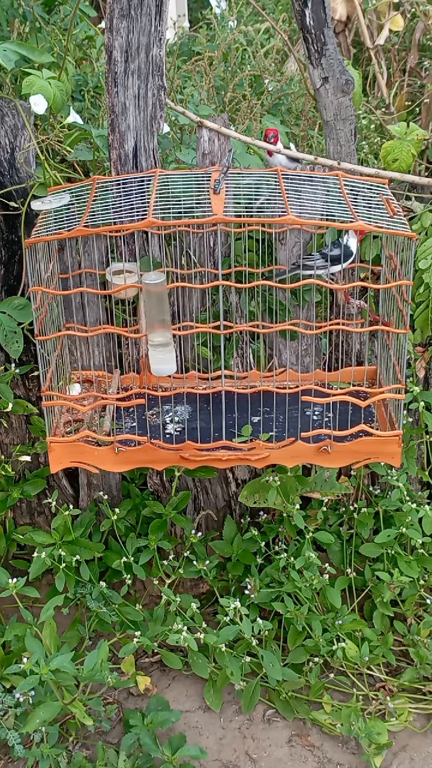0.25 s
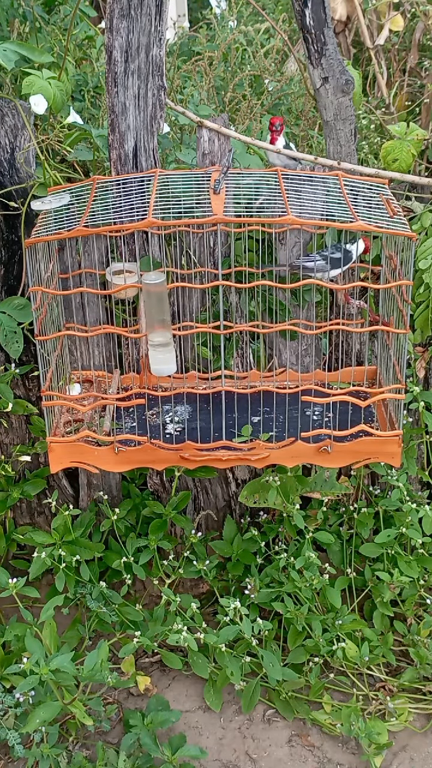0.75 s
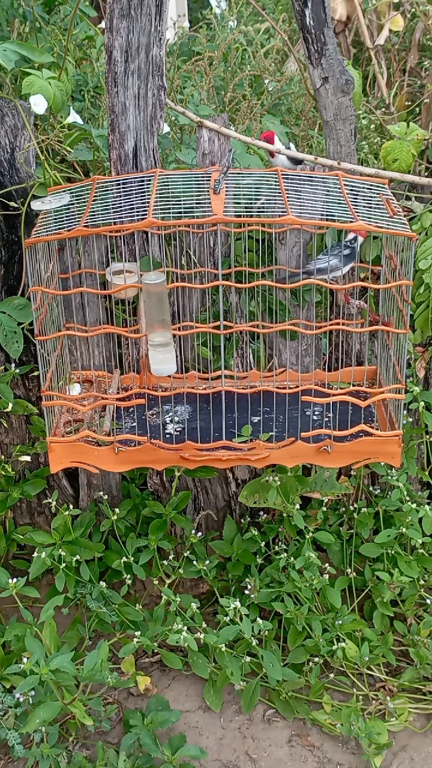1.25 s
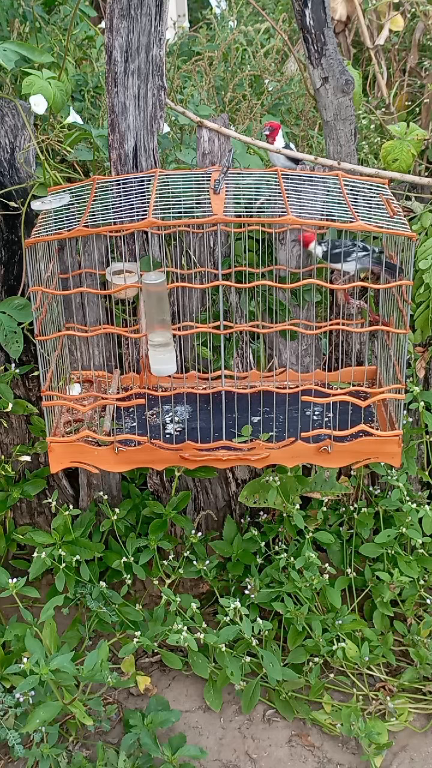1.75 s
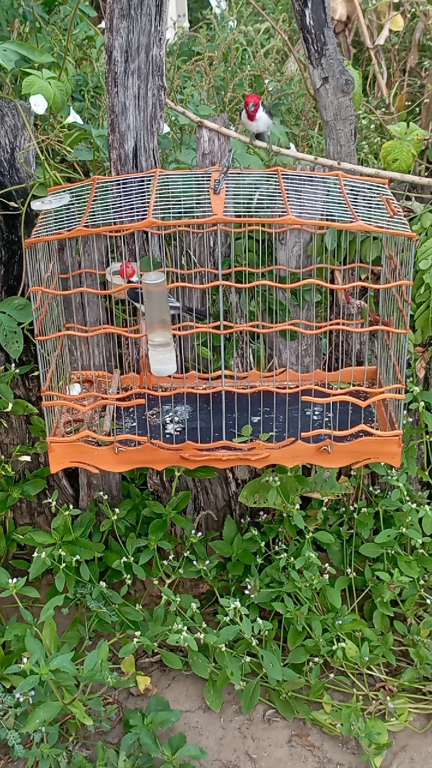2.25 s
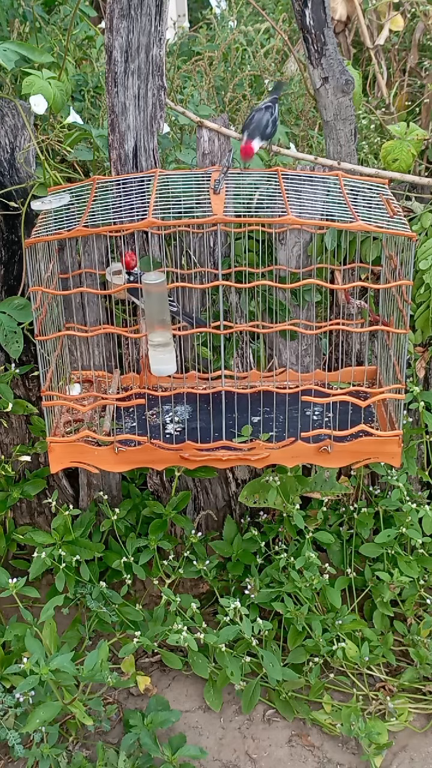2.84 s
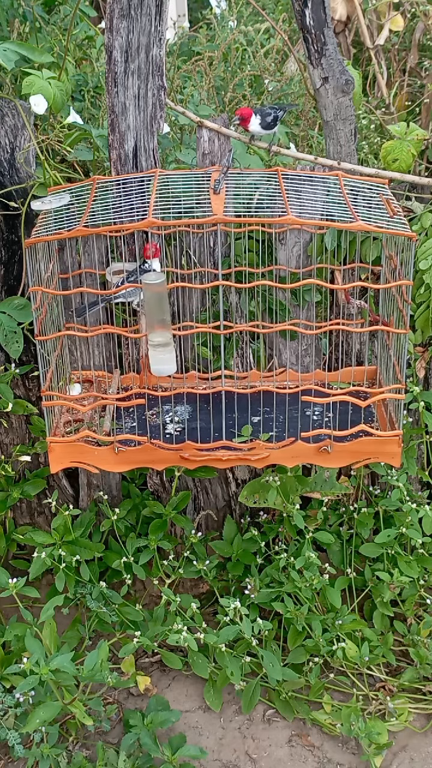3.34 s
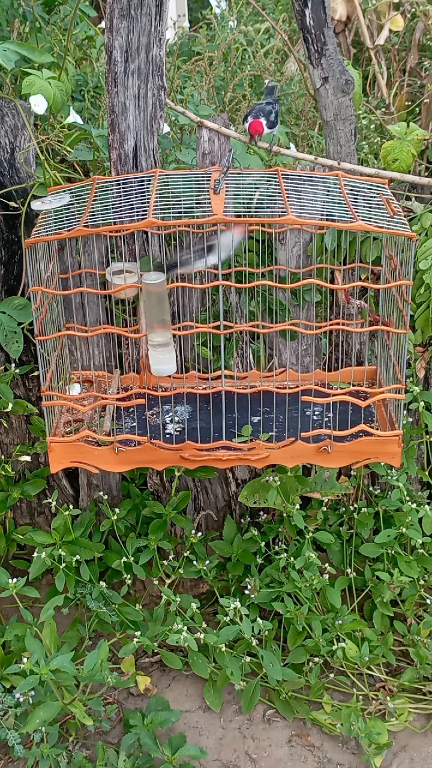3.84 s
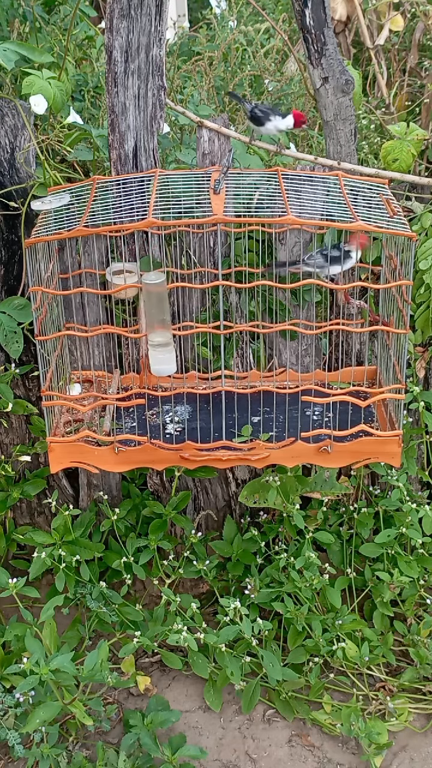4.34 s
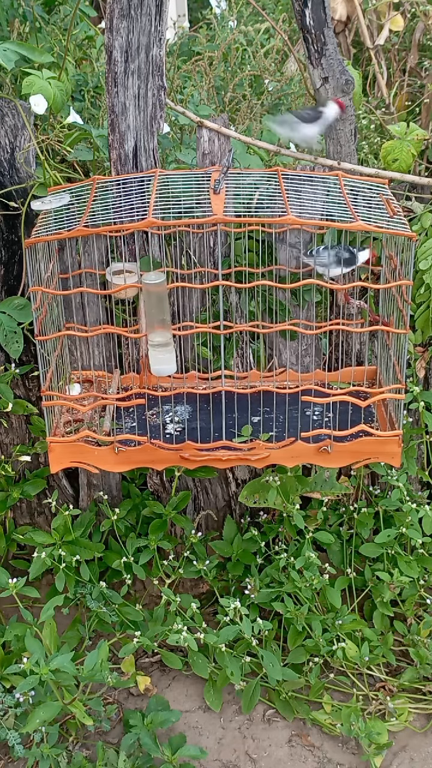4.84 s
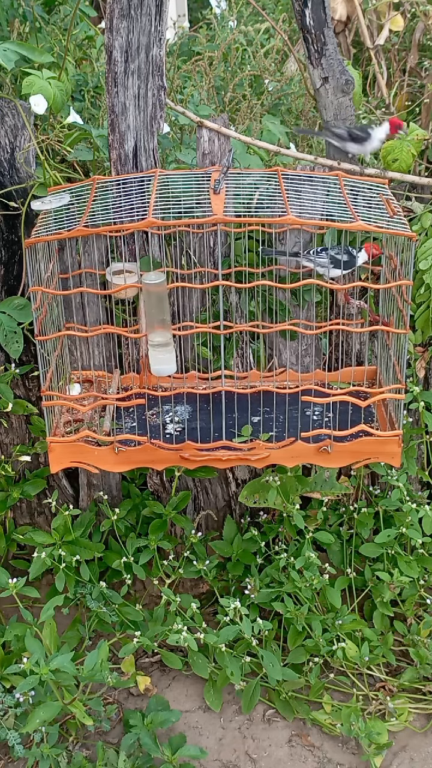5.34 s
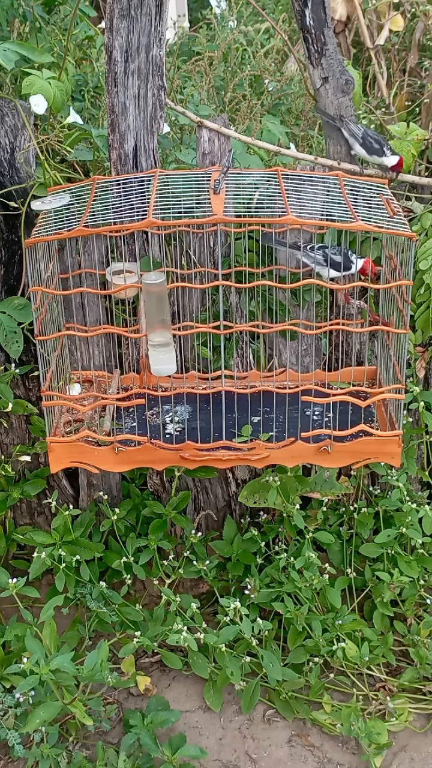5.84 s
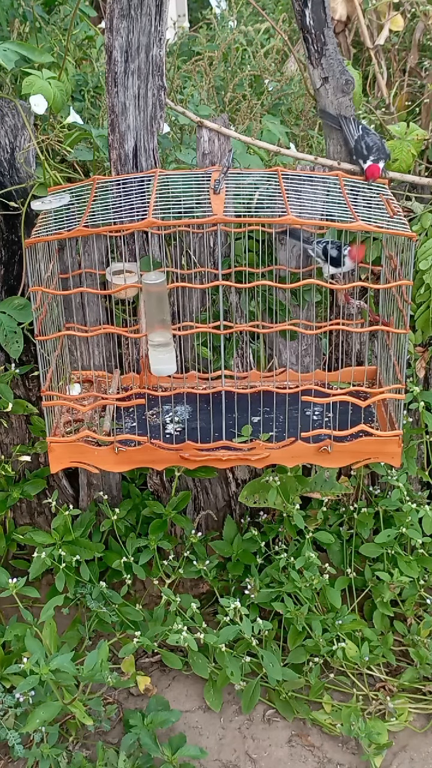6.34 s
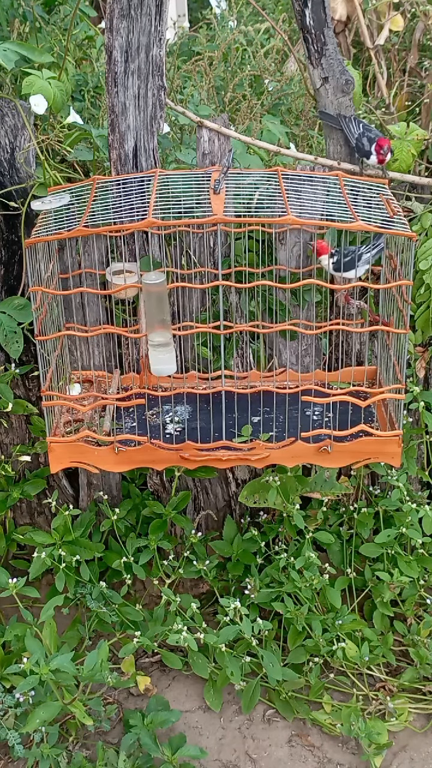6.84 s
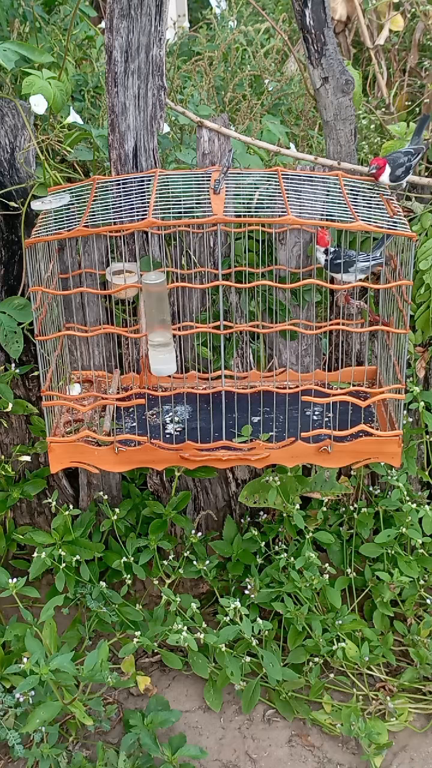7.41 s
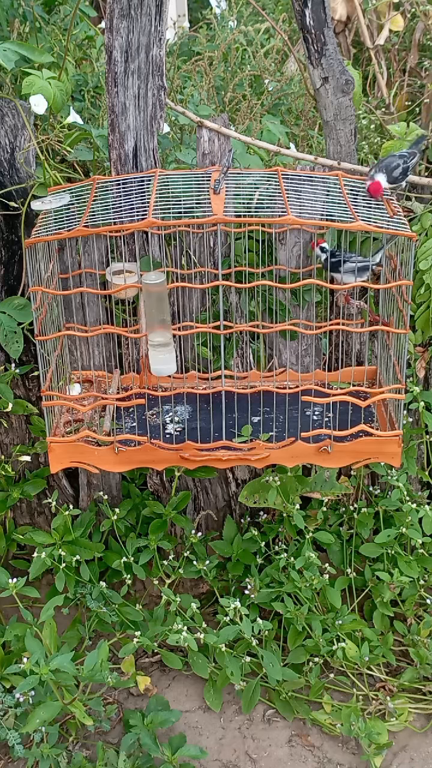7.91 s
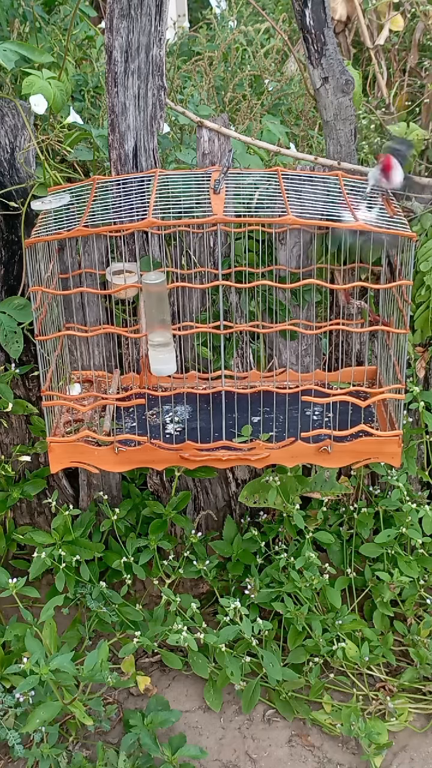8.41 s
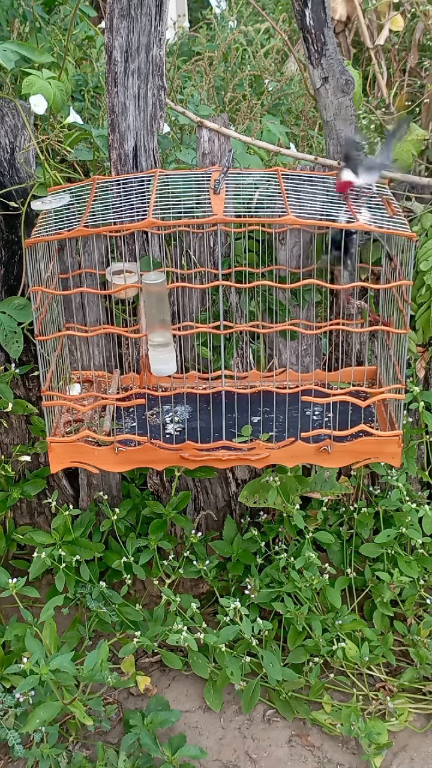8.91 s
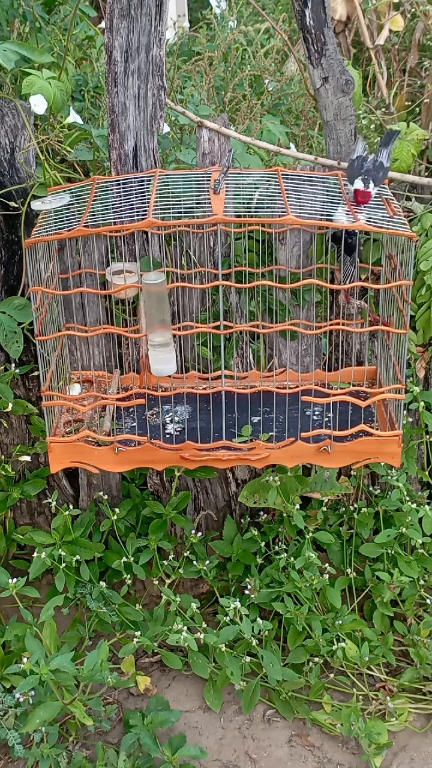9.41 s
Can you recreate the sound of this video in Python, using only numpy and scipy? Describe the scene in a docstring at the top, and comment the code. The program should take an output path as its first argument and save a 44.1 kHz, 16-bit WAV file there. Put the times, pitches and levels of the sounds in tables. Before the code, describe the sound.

Two cardinals trade sharp, sliding, sometimes raspy calls outdoors over pulsing crickets, with soft foot scuffs and wings fluttering against cage wire.

```python
"""Among bushes, a cardinal in a wire cage and one on a branch above it trade sharp, sliding calls.
Pure whistles break into rasps when the birds force their voices; late on, wings flutter against the bars.
Crickets rub their wings: a chorus swells and sinks, and a near one chirps steadily. Small birds twitter
far off, over a low rush of air and a thin hiss. Close by, on the side away from the cage, come scuffs
and soft thuds, probably feet shifting on sandy ground."""
import sys
import numpy as np
from scipy import signal
from scipy.fft import rfft, irfft
from scipy.io import wavfile
from scipy.ndimage import uniform_filter1d

SR = 44100
rng = np.random.default_rng(int(sys.argv[2]) if len(sys.argv) > 2 else 0)


def wav_out(sig):
    """Save sig, one row per channel (or a flat mono array), as 16-bit PCM at SR to the path in sys.argv[1]."""
    wavfile.write(sys.argv[1], SR, np.round(np.clip(np.atleast_2d(sig).T, -1, 1) * 32767).astype(np.int16))


N = 426447
T = np.arange(N) / SR
FREQS = np.arange(N // 2 + 1) * SR / N


def from_db(db):
    """Turn decibels into a number to multiply by."""
    return 10 ** (np.asarray(db) / 20)


def rms_one(x):
    """Scale a sound so that its average strength (rms) is 1."""
    return x / np.sqrt(np.mean(x ** 2) + 1e-20)


def at_hz(points):
    """Read a (frequency, value) table at every frequency."""
    hz, value = np.transpose(points)
    return np.interp(np.log(FREQS + 1), np.log(hz), value)


def filtered(x, gain):
    """Turn each frequency up or down by its own gain."""
    return irfft(rfft(x) * gain, N)


def noise(spectrum, alike):
    """Stereo noise of a given colour; `alike` is 0 for unrelated sides, 1 for equal ones."""
    mid, side = rng.standard_normal((2, N))
    both = np.sqrt(1 + alike) * rfft(mid) + np.sqrt(1 - alike) * rfft(side) * [[1], [-1]]
    return rms_one(irfft(both * from_db(at_hz(spectrum)), N))


def drift(rate, t=T):
    """A random wander, roughly 1 in size, with `rate` turns a second."""
    turns = (t - t[0]) * rate
    count = int(turns[-1]) + 2
    return np.interp(turns, np.arange(count), rng.standard_normal(count))


def phase_of(hz):
    """The running angle of a wave whose pitch moves."""
    return 2 * np.pi * np.cumsum(hz) / SR


def bump(time, half_length):
    """A smooth rise and fall that peaks at `time`."""
    return np.exp(-np.minimum(((T - time) / half_length) ** 2, 40))


def delayed(x, seconds):
    """The same sound a little later."""
    return filtered(x, np.exp(-2j * np.pi * FREQS * seconds))


def from_left(x, lag_s):
    """Sound from the cage's side reaches the left microphone first."""
    return np.array([x, delayed(x, lag_s)])


def from_ground(x, lag_s=0.00017):
    """Sound from underfoot reaches the right microphone first."""
    return np.array([delayed(x[0], lag_s), x[-1]])


def foliage(x, tail_s):
    """Trunks and leaves scatter a sound into a short tail, different on each side."""
    t = T[:SR // 2]
    tail = rng.standard_normal((2, len(t))) * from_db(-60 * t / tail_s) * (1 - np.exp(-t / 0.018))
    return signal.fftconvolve(x[None], tail / np.sqrt(np.sum(tail[0] ** 2)), axes=1)[:, :N]


def slur(row, offset_s=0, edge_db=-12.5, fade_s=0.0013):
    """A slur is a note that slides from start over top to end: gives its samples, pitch, gain and rasp."""
    top_s, rise, fall, start_hz, top_hz, end_hz, db, growth_db, rasp = row
    top_s += offset_s
    at = np.arange(int((top_s - rise) * SR), int((top_s + fall) * SR))
    t, position = T[at] - top_s, np.linspace(-1, 1, len(at))
    away = np.sin(np.pi / 2 * t / np.where(t < 0, rise, fall)) ** 2
    hz = top_hz + away * (np.where(t < 0, start_hz, end_hz) - top_hz)
    fade = np.clip(np.minimum(t + rise, fall - t) / fade_s, 0, 1)
    return at, hz, fade * from_db(db + growth_db * position / 2 + edge_db * position ** 2), rasp


def wavering(t, hz, rasp, jitter=0.025, shimmer=0.6):
    """Phase and strength of a bird's voice; both turn unsteady when it is forced."""
    return phase_of(hz * (1 + jitter * rasp * drift(1872, t))), 1 + shimmer * rasp * drift(1200, t)


def outdoor_air(rush_db=-56.5, hiss_db=-70):
    """A low rush and a thin hiss, each wandering a little in level."""
    # colours of the rush and the hiss: (frequency [Hz], level [dB])
    rush_colour = [(18, -72), (30, -25), (46, -13), (56, -9), (65, 6), (77, -2), (129, -0.5), (163, -3.5),
                   (242, -3.5), (311, -8.5), (513, -10), (979, -21.5), (2000, -21.5), (4400, -23.5),
                   (5400, -3.5), (9680, -120)]
    hiss_colour = [(2500, -69), (4500, -41), (6000, 1.5), (7500, -6.5), (10000, -6), (12500, -10.5),
                   (15000, -21.5)]
    # how alike the rush is on both sides: (frequency [Hz], likeness [0-1])
    likeness = [(60, 0.4), (400, 0.39), (1200, 0.18), (2500, 0), (15000, 0)]
    rush = from_db(rush_db + drift(8.8)) * noise(rush_colour, at_hz(likeness))
    return rush + from_db(hiss_db + 2.4 * drift(11)) * noise(hiss_colour, 0)


def twitter(count=170, low_hz=1670, high_hz=4590, level_db=-71.5, rise_s=0.012, fall_s=0.0197):
    """Distant birds give tiny slurs at random moments and pitches."""
    out = np.zeros(N)
    for when, pitch, size in rng.random((count, 3)):
        top_s = 0.5 + when * (T[-1] - 1)
        top_hz = low_hz * (high_hz / low_hz) ** pitch
        edge_hz, db = 0.779 * top_hz, level_db + 3 * (2 * size - 1)
        at, hz, gain, _ = slur((top_s, rise_s, fall_s, edge_hz, top_hz, edge_hz, db, 0, 0))
        phase = phase_of(hz)
        out[at] += gain * (np.sin(phase) + from_db(-8) * np.sin(2 * phase))
    return out + foliage(out, tail_s=0.17)


def far_chirps(trim_db=-12, bow=0.01338, waver=0.029, flicker_db=5):
    """Far birds give thin, flickering chirps, blurred by the leaves."""
    # chirps: (time [s], length [s], start pitch [Hz], end pitch [Hz], level before trim [dB])
    chirps = [(2.415, 0.072, 3100, 4500, -52), (2.611, 0.072, 3170, 4470, -53.5),
              (2.718, .04, 4400, 4100, -50), (2.863, 0.059, 2710, 3060, -49),
              (3.513, 0.13, 3470, 3270, -48.5), (3.617, 0.21, 4730, 2760, -50.5),
              (6.189, 0.075, 2890, 3250, -48), (6.216, 0.05, 3750, 3860, -45),
              (6.446, 0.07, 3040, 4270, -47), (8.06, 0.053, 3280, 2280, -60), (8.676, .07, 4120, 3730, -52),
              (9.07, 0.066, 3500, 4200, -55), (9.292, 0.066, 3500, 3990, -57)]
    out = np.zeros(N)
    for time, length, start_hz, end_hz, db in chirps:
        progress = np.linspace(0, 1, int(length * SR))
        t, arch = progress * length, np.sin(np.pi * progress)
        hz = (start_hz + (end_hz - start_hz) * progress) * (1 + bow * arch + waver * drift(305, t))
        gain = from_db(db + trim_db + flicker_db * drift(78, t)) * arch
        out[int(time * SR) + np.arange(len(t))] += gain * np.sin(phase_of(hz))
    return out + from_db(-3) * foliage(out, tail_s=0.54)


def far_song(first_s=0.093, every_s=0.2045, repeats=7):
    """A far bird repeats one phrase; forcing its voice adds tones at 0.5 and 1.5 times the pitch."""
    # slurs: (time of the top in the phrase [s], rise [s], fall [s], start pitch [Hz], top pitch [Hz],
    # end pitch [Hz], level [dB], growth in level [dB], rasp [0-1])
    phrase = [(.016, .016, 0.017, 1597, 2210, 1400, -69, 29, 0.23),
              (.043, .011, 0.025, 2240, 2860, 2140, -70, -17, 0.72),
              (.062, .006, 0.021, 2270, 2170, 2100, -64.5, -15, .2)]
    out = np.zeros(N)
    for k in range(repeats):
        for row in phrase:
            at, hz, gain, rasp = slur(row, first_s + k * every_s)
            phase, strength = wavering(T[at], hz, rasp, jitter=0.018)
            growl = from_db(3) * np.sin(phase / 2) + from_db(-19) * np.sin(1.5 * phase)
            out[at] += gain * strength * (np.sin(phase) + rasp * growl)
    return out + from_db(-7) * foliage(out, tail_s=0.072)


def cricket_group(centre_hz, scratch, spread_hz=0, count=1, bend=0, octave_db=-11):
    """Each wing stroke is a scratchy tone with its octave; the pitch sags as the wing slows."""
    out = np.zeros((2, N))
    for hz in centre_hz + spread_hz * np.linspace(-1, 1, count):
        strokes_per_s = 53.6 * rng.uniform(1.0, 1.02)
        stroke = (T * strokes_per_s + rng.random() + 0.18 * drift(4)) % 1
        pitch = hz * (1 + bend) * (1 + 0.025 * (0.5 - stroke) + scratch * drift(700))
        phase = phase_of(pitch) + rng.uniform(0, 2 * np.pi, (2, 1))
        out += np.sin(np.pi * stroke) * (np.sin(phase) + from_db(octave_db) * np.sin(2 * phase))
    return rms_one(out)


def cricket_chorus(crowd_rise_db=7.5, rest_db=-22, edge_s=0.0512, pitch_lift=0.018):
    """A crowd of crickets swells and sinks; two nearer ones join each swell, pitch lifting with effort."""
    # swells: (middle time [s], half length [s], extra level [dB])
    swells = [(0.388, .21, 1), (1.211, .19, 0), (2.041, 0.22, -1.5), (2.847, 0.2, 0.5), (3.66, 0.18, 1.5),
              (4.46, .2, 1), (5.25, .18, 0), (6.078, .19, 0), (6.888, .2, -2.5), (7.717, .18, -1),
              (8.519, .19, -0.5), (9.397, .19, -2.5)]
    swell_db, effort, singing = np.zeros((3, N))
    for time, half_length, db in swells:
        swell_db += (crowd_rise_db + db) * bump(time, half_length)
        bout = 0.5 + 0.5 * np.tanh((half_length - np.abs(T - time)) / edge_s)
        effort += bout
        singing += bout * from_db(db)
    bend = pitch_lift * (effort - 1)
    crowd = cricket_group(centre_hz=5250, scratch=0.024, spread_hz=170, count=6, octave_db=-20)
    lead = cricket_group(centre_hz=5490, scratch=0.013, bend=bend + 0.005 * drift(7))
    second = cricket_group(centre_hz=5340, scratch=0.012, bend=bend + 0.005 * drift(7))
    crowd *= from_db(-62 + swell_db + 1.5 * drift(10))
    pair = lead * from_db(-55 + 1.6 * drift(25)) + second * from_db(-57 + 1.6 * drift(12))
    return crowd + (singing + from_db(rest_db)) * pair


def near_cricket(pitch_hz=6600, level_db=-51, every_s=0.655, strokes_per_s=40, stroke_count=13):
    """Each chirp is a run of wing strokes, each a short tone that falls slightly in pitch."""
    # spells of chirping: (first chirp [s], end [s])
    bouts = [(-.172, 5.45), (5.811, 7.5), (7.792, 9.5)]
    gain, slide = np.zeros((2, N))
    for time in np.concatenate([np.arange(first, end, every_s) for first, end in bouts]):
        strokes = (T - time) * strokes_per_s
        on = (strokes > 0) & (strokes < stroke_count)
        progress = np.minimum(strokes[on] % 1 / 0.74, 1)   # the wing sounds for 74% of a stroke
        gain[on] = np.abs(np.sin(np.pi * progress)) ** 0.88
        slide[on] = 0.5 - progress
    hz = pitch_hz * (1 + 0.016 * slide + 0.0044 * drift(500))
    song = from_db(level_db) * gain * np.sin(phase_of(hz))
    return from_left(song, lag_s=0.00019) + from_db(-13) * foliage(song, tail_s=1.0)


def thuds():
    """Soft footfalls shake low ringing tones; some thuds are dull, others reach the higher tones too."""
    # footfalls: (time [s], level [dB], rise [s], fall [s], dull above [Hz])
    footfalls = [(1.52, -49, 0.014, 0.018, 700), (2.36, -55.5, 0.074, 0.3, 700),
                 (3.78, -48, 0.079, 0.45, 237), (4.103, -42.5, 0.061, 0.047, 650),
                 (4.418, -37, 0.073, 0.025, 153), (4.591, -46, 0.015, 0.036, 430),
                 (4.754, -44, 0.024, 0.031, 398), (5.0, -43, 0.018, 0.042, 590),
                 (5.893, -40, 0.03, 0.034, 292), (7.394, -40.5, 0.0034, 0.028, 1390),
                 (7.525, -45.5, 0.006, 0.023, 412), (8.202, -51.5, 0.0079, 0.035, 900),
                 (8.46, -50.5, 0.011, 0.12, 790), (9.6, -60, 0.096, 0.051, 875)]
    # ringing tones of a thud: (pitch [Hz], width [Hz], level [dB])
    tones = [(117, 74, -6), (234.5, 23, 5.5), (443, 56, -0.5), (652, 47, -5.5), (956, 250, -6)]
    body = sum((-1) ** k * from_db(db) / (1 + 1j * (FREQS - hz ** 2 / (FREQS + 1)) / width)
               for k, (hz, width, db) in enumerate(tones))
    shake = rms_one(filtered(rng.standard_normal(N), body))
    out = np.zeros(N)
    for time, db, rise, fall, corner_hz in footfalls:
        push = np.exp(-np.minimum(np.maximum((time - T) / rise, (T - time) / fall), 40))
        cut_highs = signal.butter(2, corner_hz, fs=SR, output="sos")
        out += from_db(db) * push * signal.sosfilt(cut_highs, shake)
    return from_ground([out])


def scuffs(trim_db=-1, hollow_db=7, loss_db_per_octave=9):
    """Sand grinds under a sole as grainy, hollow noise; some scuffs are full, others thinner."""
    # scuffs: (time [s], level before trim [dB], half length [s], thin below [Hz], hollowest at [Hz])
    scrapes = [(1.786, -44, 0.058, 150, 640), (1.85, -43.5, 0.066, 150, 840),
               (1.933, -45, 0.047, 300, 1300), (2.002, -48, 0.055, 200, 1350),
               (2.123, -46, 0.065, 300, 1680), (3.072, -44.5, 0.085, 180, 950),
               (3.165, -45.5, 0.058, 180.4, 1350), (4.027, -52.5, 0.16, 180, 790),
               (4.298, -44.5, .11, 580, 1320), (6.89, -54, 0.25, 520, 920)]
    # colour of grinding sand: (frequency [Hz], level [dB])
    sand_colour = [(150, -24), (255, -5), (430, -19), (700, -15.5), (1300, -18.5), (2000, -13.5),
                   (3100, -12.5), (5400, -18), (9000, -20), (14000, -33)]
    # hollow ringing tones: (pitch [Hz], width [Hz], relative level [dB])
    tones = [(597, 40, 16), (838, 50, 6), (1290, 80, 11), (1400, 70, 8), (1590, 90, 6), (2400, 160, 1)]
    sand, out = noise(sand_colour, alike=0.48), np.zeros((2, N))
    rings = []
    for hz, width, db in tones:
        ring = signal.lfilter(*signal.iirpeak(hz, hz / width, fs=SR), sand)
        rings.append((hz, from_db(db + 2 * drift(20)) * ring))
    grains = from_db(1.5 * drift(250) + 2 * drift(45))
    for time, db, half_length, edge_hz, hollow_hz in scrapes:
        hollow = sum(from_db(hollow_db - loss_db_per_octave * abs(np.log2(hz / hollow_hz))) * ring
                     for hz, ring in rings)
        cut_lows = signal.butter(2, edge_hz, "high", fs=SR, output="sos")
        grit = signal.sosfilt(cut_lows, rms_one(sand + hollow))
        out += from_db(db + trim_db) * bump(time, half_length) * grains * grit
    return from_ground(out)


def flutter(rustle_start_s=8.2, rustle_end_s=8.8, rustle_db=-63.5, rise_s=0.0012, fall_s=0.0075):
    """Each wingbeat is a dull flap and a crisp rake along the wires, over a lighter feather rustle."""
    # wings and feet brush the bars: (time [s], rake level [dB], flap level [dB], length [s])
    brushes = [(2.137, -52, -53, 0.012), (6.463, -57, -60.5, 0.0065), (7.401, -55, -55, 0.016),
               (8.132, -73, -53, 0.0043), (8.19, -47.5, -46, 0.031), (8.27, -53, -51, 0.0078),
               (8.294, -52, -49, 0.022), (8.33, -47, -61, 0.0045), (8.45, -45.5, -57, 0.0055),
               (8.478, -50, -55, 0.012), (8.517, -64, -52.5, 0.0067), (8.555, -46.5, -50.5, 0.016),
               (8.685, -70, -56, 0.006), (8.893, -67, -54.5, 0.0044), (9.14, -56, -79, .002),
               (9.205, -57, -57.5, 0.0079), (9.422, -58, -68, .003)]
    # colours of the rake and the flap: (frequency [Hz], level [dB])
    rake_colour = [(300, -25), (1500, 2), (3000, -1), (5000, 7.5), (8000, 5.5), (11000, 4), (15000, -7)]
    flap_colour = [(40, -25), (200, 9.5), (600, 2), (1500, -5), (3000, -6.5), (6000, -8)]
    flapping = np.exp(np.clip(np.minimum((T - rustle_start_s) / 0.029, (rustle_end_s - T) / 0.35), -40, 0))
    rustle = flapping * from_db(rustle_db + 6 * np.tanh(drift(60)))
    rake_gain, flap_gain = rustle.copy(), rustle.copy()
    for time, rake_db, flap_db, length in brushes:
        contact = np.exp(-np.clip(np.maximum((time - T) / rise_s, (T - time - length) / fall_s), 0, 40))
        rake_gain += contact * from_db(rake_db)
        flap_gain += contact * from_db(flap_db)
    rake = noise(rake_colour, alike=0.57) * rake_gain * from_db(3 * drift(1500))
    left, right = rake + noise(flap_colour, alike=0.57) * flap_gain
    return np.array([left, delayed(right, 0.00011)])


def whistles(trim_db=-1, overtone_step_db=-3, rasp_db=-12):
    """A cardinal slurs with one voice: gives the tone, overtones and strength of the breath noise."""
    # slurs: (time of the top [s], rise [s], fall [s], start pitch [Hz], top pitch [Hz], end pitch [Hz],
    # level before trim [dB], growth in level [dB], rasp [0-1], overtones against the tone [dB])
    slurs = [(1.652, 0.084, 0.0044, 2810, 4640, 4750, -29, 6, 0.6, -22),
             (1.727, 0.021, 0.031, 2970, 3470, 2830, -37, -11, 0.55, -26),
             (3.288, 0.024, 0.02, 1978, 2230, 1926, -35, 9, 0.13, -22),
             (3.343, 0.043, 0.066, 1943, 3024, 1276, -31.5, -9.5, 0.36, -13),
             (6.757, 0.046, 0.035, 2170, 2460, 2270, -37.5, 18, 0.6, -18),
             (6.822, 0.036, 0.035, 2350, 3525, 2250, -24, -6, 0.1, -21),
             (5.736, 0.0077, 0.013, 2860, 2790, 2400, -29, -1, 0, -26),
             (6.952, 0.0043, 0.023, 2880, 2836, 1900, -34, -29, 0.5, -26),
             (7.76, 0.01, 0.011, 3230, 3240, 3310, -25, -3, 0, -30),
             (7.776, 0.014, .02, 3280, 3870, 2380, -29.5, -6, 0.04, -23),
             (7.811, 0.025, 0.022, 2440, 2946, 2140, -24.5, -7, 0.11, -24.5),
             (7.897, 0.00348, 0.0244, 1970, 1840, 1330, -44, -27, 0.1, -30)]
    tone, overtones, breath = np.zeros((3, N))
    for *shape, overtones_db in slurs:
        at, hz, gain, rasp = slur(shape)
        phase, strength = wavering(T[at], hz, rasp)
        tone[at] += gain * strength * np.sin(phase)
        for k in range(2, 6):
            share = from_db(overtones_db + overtone_step_db * (k - 2)) * (k * hz < SR / 2)
            overtones[at] += gain * strength * share * np.sin(k * phase)
        breath[at] += gain * rasp * from_db(rasp_db)
    return from_db(trim_db) * np.array([tone, overtones, breath])


def contour(rows, smooth_s=0.00065):
    """Join a call's points into smooth curves: gives its samples, its fade and one curve a column."""
    times, *columns = np.transpose(rows)
    at = np.arange(int(times[0] * SR), int(times[-1] * SR))
    fade = np.clip(np.minimum(at - at[0], at[-1] - at) / (smooth_s * SR), 0, 1)
    window = int(smooth_s * SR) + 1
    return at, fade, [uniform_filter1d(np.interp(T[at], times, column), window) for column in columns]


def forced_calls(trim_db=-2, rasp_db=-13, sum_top_hz=10000):
    """Both sides of the voice box sound at once and shake each other, adding tones at summed pitches."""
    # one list a call, levels before trim: (time [s], low voice [Hz], its level [dB],
    # its octave's level [dB], high voice [Hz], its level [dB], rasp [0-1])
    calls = [
        [(.395, 2220, -48, -56, 3650, -59, 0.2), (.41, 2660, -43, -43, 4400, -31, 0.44),
         (.423, 2910, -42, -30, 4980, -26.5, 0.47), (.433, 2800, -44, -25.5, 5100, -26, 0.5),
         (.443, 3590, -37, -35, 4950, -36, 0.75), (.451, 3730, -38, -48, 4970, -39, .9)],
        [(.443, 3710, -70, -70, 8800, -42, .4), (.45, 3800, -62, -50, 8650, -27, .5),
         (.458, 3600, -38, -32, 7330, -32, 0.8), (.465, 3500, -42, -36, 6070, -21.5, 0.46),
         (.473, 3080, -43, -30, 4920, -27, .7), (.479, 2950, -45, -44, 4720, -29, 1),
         (.484, 2680, -44, -31, 5280, -30, .7), (.49, 3200, -54, -44, 6300, -42, 1)],
        [(1.644, 4430, -47, -70, 4720, -21, 0.5), (1.65, 3990, -43, -44, 4960, -17, 0.4),
         (1.661, 2790, -39, -50, 5300, -21, 0.4), (1.67, 2360, -36, -48, 4890, -20.5, 0.6),
         (1.677, 1850, -44, -48, 3800, -29, 1), (1.684, 1590, -46, -48, 3220, -35, 1),
         (1.696, 2520, -38, -48, 3140, -41, 1)],
        [(3.426, 1576, -46, -46, 3600, -42, 1), (3.436, 2107, -46, -54, 4100, -32, 0.8),
         (3.442, 1900, -55, -67, 4310, -17.5, 0.7), (3.449, 2500, -37, -33, 3970, -34, .9),
         (3.458, 1260, -51, -46, 3900, -40, 0.9), (3.477, 1588, -40, -36.5, 3940, -36, 0.8),
         (3.492, 1293, -51, -39, 3600, -43, 0.8), (3.508, 787, -55, -53, 3180, -58, 0.94)],
        [(5.668, 3270, -72, -70, 3170, -51, 0.4), (5.688, 3600, -62, -47, 3450, -35, .4),
         (5.7, 2810, -43, -56, 3840, -23, 0.35), (5.707, 2400, -40, -52, 4550, -19, 0.35),
         (5.712, 2356, -50, -42, 5470, -25.5, .4), (5.72, 2126, -45, -25, 5170, -55, 0.5),
         (5.731, 1830, -37, -33, 4470, -48, 0.7), (5.742, 1440, -54, -54, 4300, -50, 0.7),
         (5.76, 1900, -41, -58, 4000, -63, 0.8)],
        [(6.881, 1880, -35, -52, 3760, -58, 0.4), (6.889, 2030, -43, -32, 4125, -48, 0.4),
         (6.902, 1725, -39, -34, 3720, -27.5, 0.36), (6.911, 1850, -47, -48, 3856, -23, 0.75),
         (6.92, 2315, -64, -60, 5610, -24.5, 0.6), (6.931, 2420, -50, -54, 5390, -24.5, 0.75),
         (6.941, 2070, -41, -40, 3920, -26, 1), (6.95, 1540, -41, -52, 3580, -46, .8)],
        [(7.855, 1196, -56, -65, 1290, -58, .2), (7.865, 1860, -36, -60, 2094, -43, .3),
         (7.873, 2615, -40, -62, 2890, -47, 0), (7.88, 2970, -33, -61, 3280, -26, 0),
         (7.886, 2964, -32, -61, 3250, -39, .1), (7.894, 1930, -34, -63, 2100, -56, 0.1)],
    ]
    tone, overtones, breath = np.zeros((3, N))
    for call in calls:
        at, fade, (low_hz, low_db, octave_db, high_hz, high_db, rasp) = contour(call)
        low_phase, low_strength = wavering(T[at], low_hz, rasp)
        high_phase, high_strength = wavering(T[at], high_hz, rasp)
        sum_phase = low_phase + high_phase
        base, octave, high = (fade * from_db(db + trim_db) for db in (low_db, octave_db, high_db))
        low = np.hypot(base, octave)
        both = np.sqrt(low * high)
        tone[at] += low_strength * (base * np.sin(low_phase) + octave * np.sin(2 * low_phase))
        tone[at] += high_strength * high * np.sin(high_phase)
        throat_passes = low_hz + high_hz < sum_top_hz   # only lower sum tones come through strongly
        tone[at] += np.sqrt(octave * high) * from_db(-5) * np.sin(sum_phase) * throat_passes
        overtones[at] += high * from_db(-21) * np.sin(2 * high_phase)
        overtones[at] += low * from_db(-17) * (np.sin(3 * low_phase) + np.sin(4 * low_phase))
        sum_tones = np.sin(sum_phase) + np.sin(sum_phase + low_phase) + np.sin(sum_phase + high_phase)
        overtones[at] += both * from_db(-14) * sum_tones
        breath[at] += (low + high + both) * rasp * from_db(rasp_db)
    return np.array([tone, overtones, breath])


def cardinals(left_echo_s=0.0024, right_echo_s=0.002134, echo_db=-8, leaves_db=-14):
    """The calls leave the beak, breathy where they rasp, then bounce off a trunk and the leaves."""
    # how the open beak colours the overtones: (frequency [Hz], gain [dB])
    beak = [(3000, 12), (5000, -7.5), (7000, -10), (8800, 2), (12000, 1.5), (15000, -41)]
    # colour of the swirling breath: (frequency [Hz], level [dB])
    breath_colour = [(700, -26), (1500, -14), (3000, -10), (4500, -2), (6500, -7.5), (9000, 0), (12000, -4),
                     (15000, -14)]
    # the calls sound duller at the shaded right microphone: (frequency [Hz], gain [dB])
    shade = [(2000, 0), (4000, -1), (6000, -2.5), (8500, -9), (12000, -8.5)]
    tone, overtones, breath = whistles() + forced_calls()
    calls = tone + filtered(overtones, from_db(at_hz(beak))) + breath * noise(breath_colour, 0.85)[0]
    trunk = np.array([delayed(calls, left_echo_s), delayed(calls, right_echo_s)])
    left, right = from_left(calls, lag_s=0.00014) + from_db(echo_db) * trunk
    leaves = from_db(leaves_db) * foliage(calls, tail_s=0.12)
    return np.array([left, filtered(right, from_db(at_hz(shade)))]) + leaves


def scene():
    """Birds, crickets, feet and wings, all in the open air."""
    birds = cardinals() + far_chirps() + far_song() + twitter()
    return birds + cricket_chorus() + near_cricket() + thuds() + scuffs() + flutter() + outdoor_air()


def record(dry, cutoff_hz=15500):
    """The shaded right microphone is duller than the left; the highest treble is cut steeply on both."""
    # colour of the right microphone: (frequency [Hz], gain [dB])
    right_colour = [(100, 0), (800, .5), (2400, 0), (4000, 0), (5500, -1.5), (6600, -4.5), (9500, -4.5),
                    (12000, -3.5), (15000, 3)]
    sides = np.array([dry[0], filtered(dry[1], from_db(at_hz(right_colour)))])
    return signal.sosfilt(signal.ellip(10, 0.1, 80, cutoff_hz, fs=SR, output="sos"), sides)


dry = scene()
out = record(dry)
wav_out(out)
```